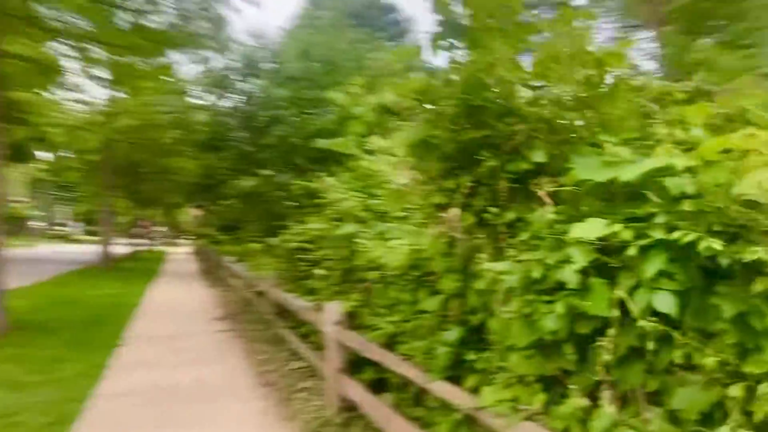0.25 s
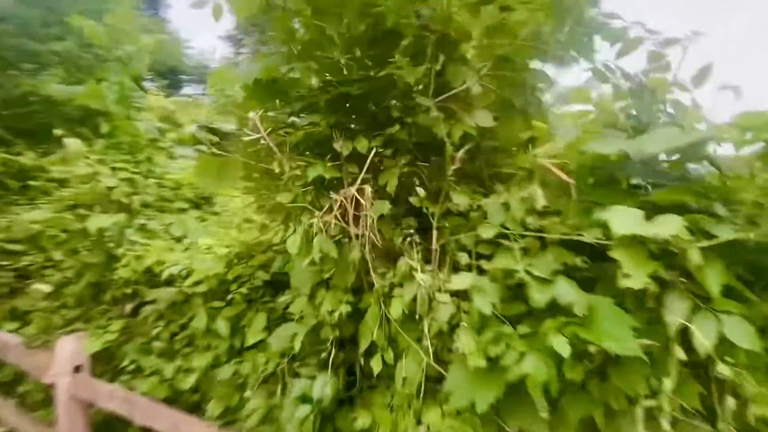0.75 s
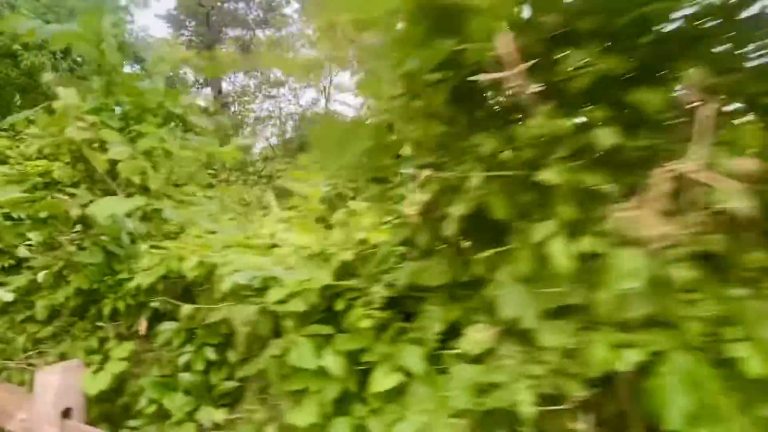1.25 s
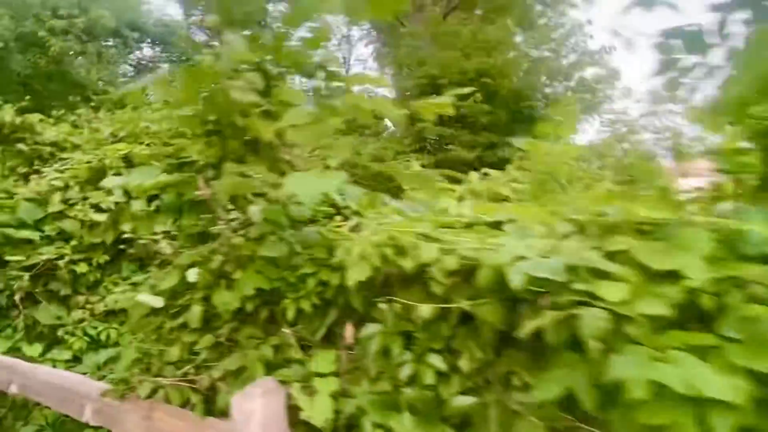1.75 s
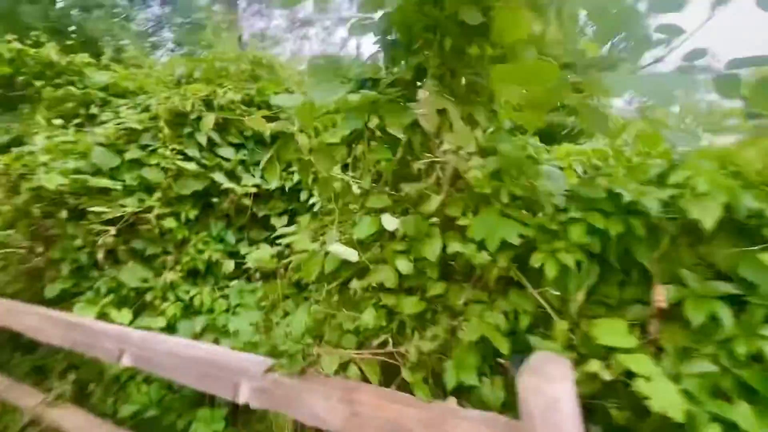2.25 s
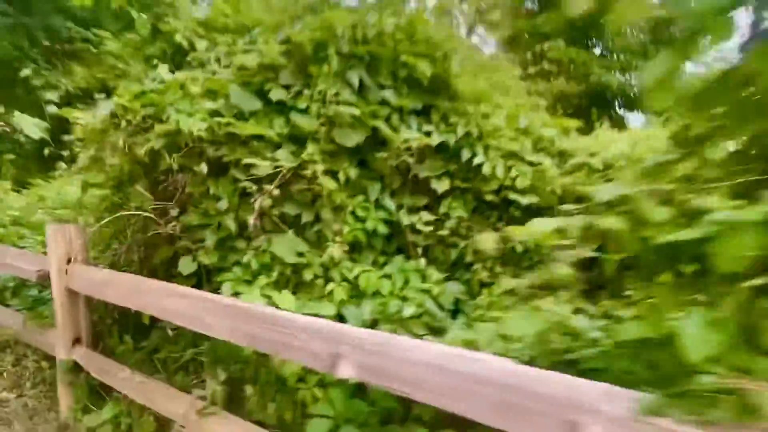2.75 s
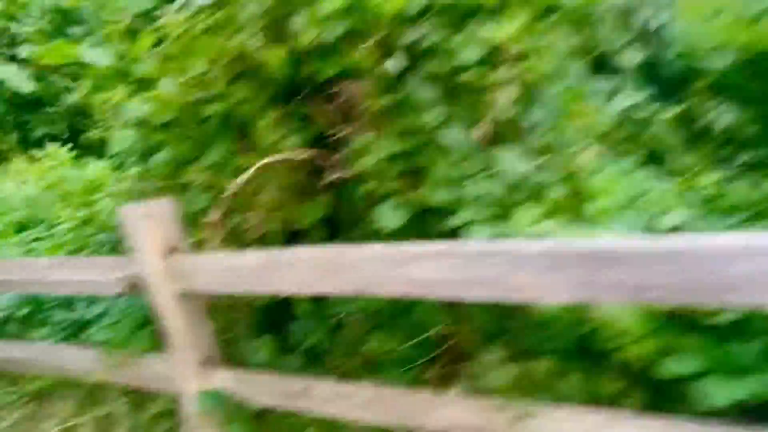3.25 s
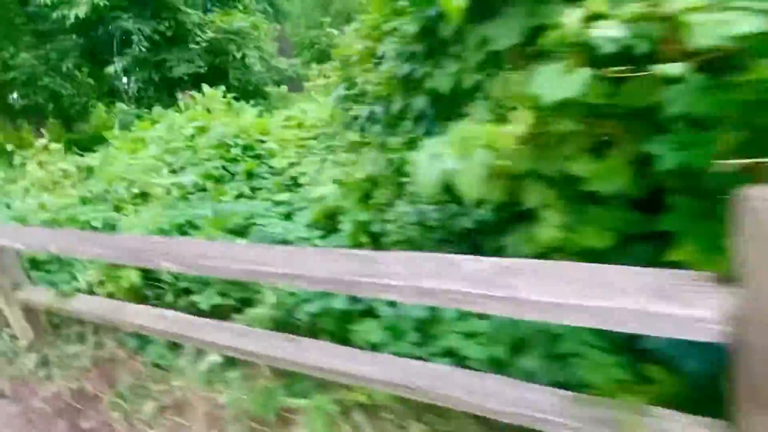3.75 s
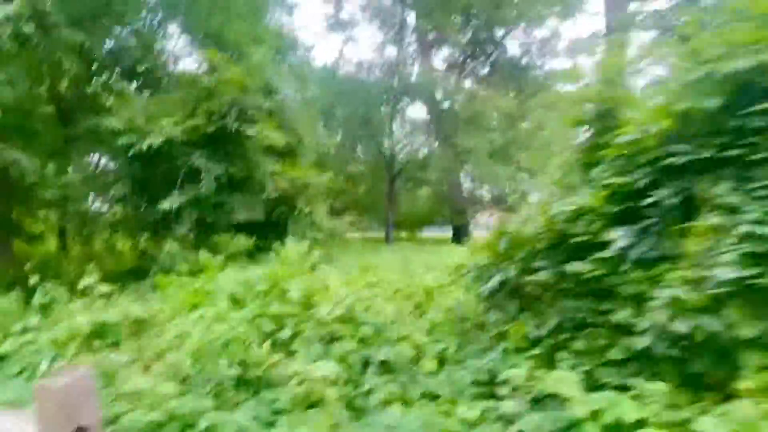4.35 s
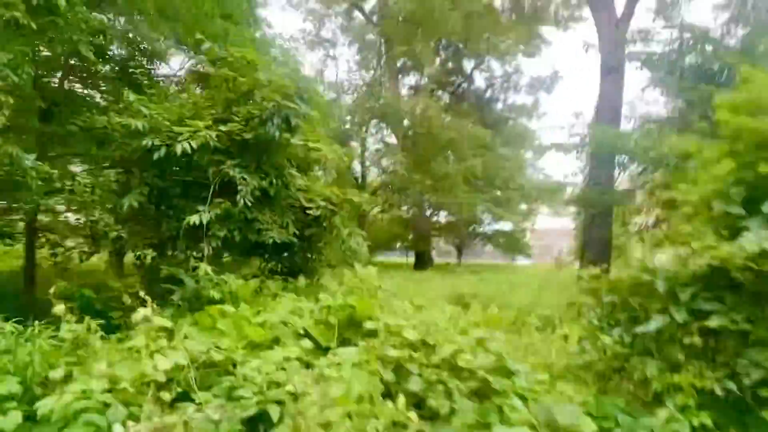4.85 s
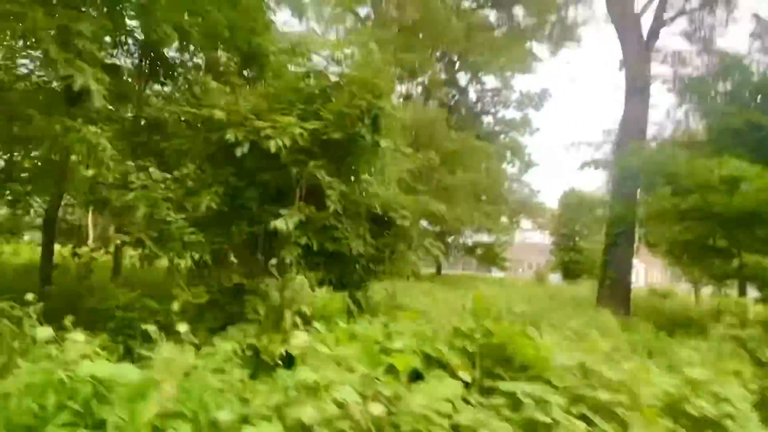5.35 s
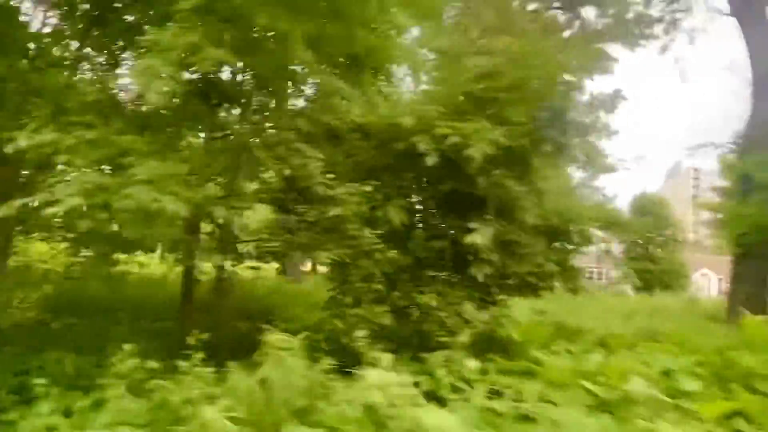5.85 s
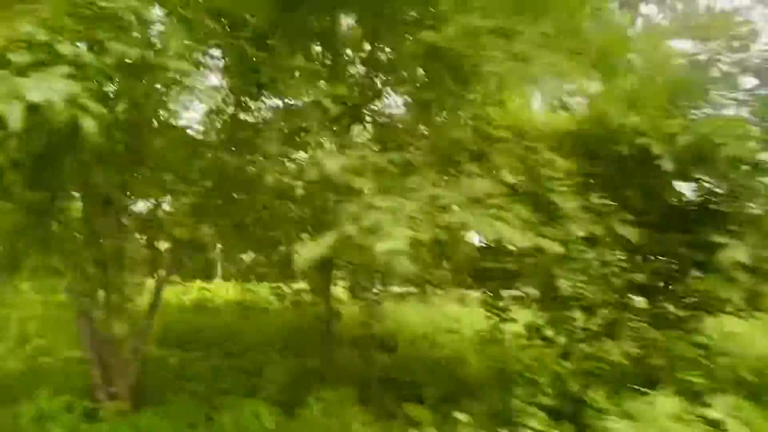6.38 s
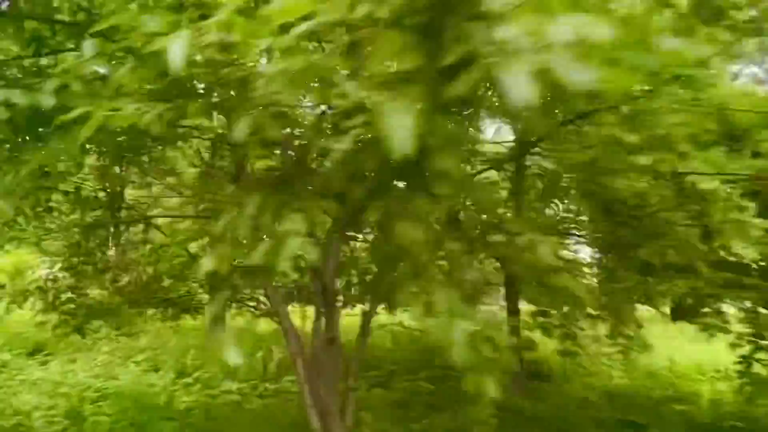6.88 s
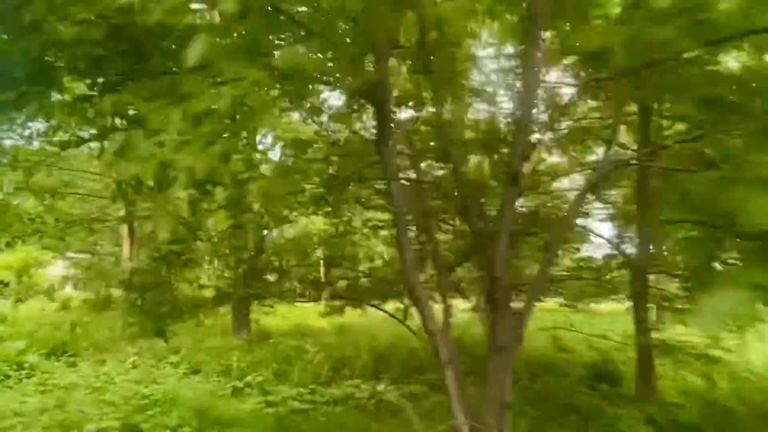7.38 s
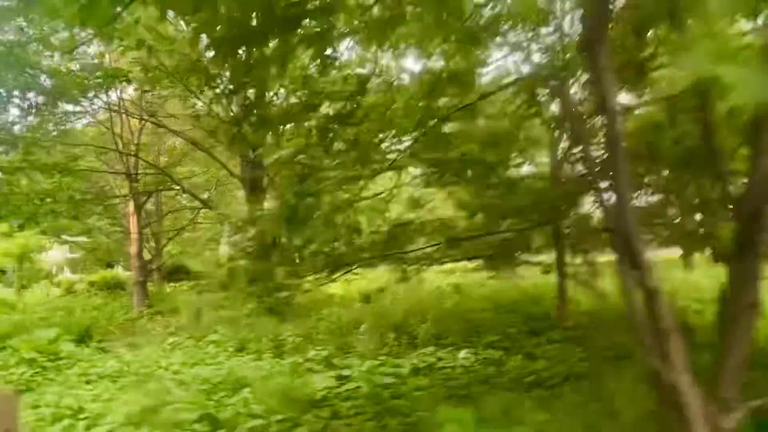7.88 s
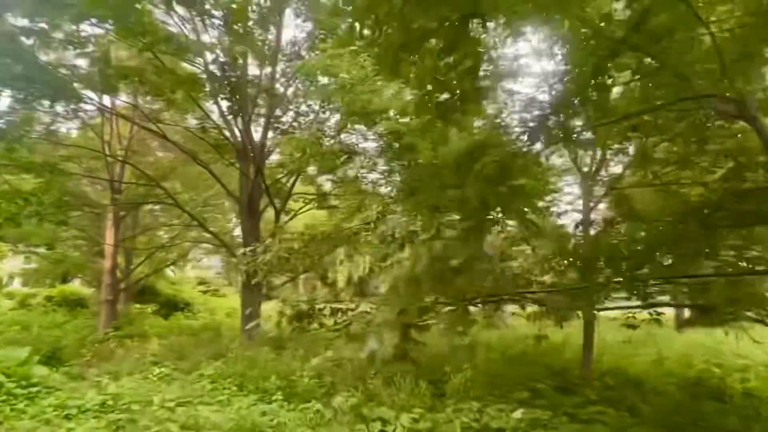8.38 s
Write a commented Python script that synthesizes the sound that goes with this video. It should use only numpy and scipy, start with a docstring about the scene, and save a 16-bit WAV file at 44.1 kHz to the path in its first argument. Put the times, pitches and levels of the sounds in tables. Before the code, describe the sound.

Close to a skateboard on a concrete sidewalk beside a hedge, microphone handheld above the wheels. Heavy low thuds and a scuff open, then soft axle knocks. Broken slabs bring rattling chatter and snapping stones, then sharp double knocks at each joint over rolling roar and gritty crackle. A thin wheel whine appears at the end; a bird slurs faintly.

```python
"""Concrete sidewalk, hedge alongside; the microphone is on a camera in the skateboard rider's hand, above the wheels.
At first jolts thud low, axles knock over a joint, a shoe scuffs and a bird slurs faintly in the trees.
From 2.3 s the board chatters over broken slabs and pits, with scuffs and snapping stones, and picks up speed.
From 4 s hard knocks come at each joint over roar and crackling grit, and the hedge returns a faint tail.
A thin wheel whine enters near the end. Filtered noise and grains make the textures, ringing modes the deck."""
import sys
import numpy as np
from scipy import signal
from scipy.fft import rfft, irfft, next_fast_len
from scipy.io import wavfile
from scipy.ndimage import uniform_filter1d, map_coordinates

SR = 44100
rng = np.random.default_rng(int(sys.argv[2]) if len(sys.argv) > 2 else 0)


def generate_wav(sig):
    """Save sig (samples, or channels by samples) to the path in sys.argv[1] as 16-bit PCM at SR."""
    pcm = np.round(np.clip(np.atleast_2d(sig).T, -1, 1) * 32767).astype(np.int16)
    wavfile.write(sys.argv[1], SR, pcm)


N = 380128
TIME = np.arange(N) / SR
LEAD = 256  # samples ahead of each contact, room for the part that filtering brings early


def gain_of(db):
    """Decibels to amplitude."""
    return 10 ** (np.asarray(db) / 20)


def evened(x):
    """Scales to rms 1."""
    return x / np.sqrt(np.mean(x ** 2) + 1e-20)


def peaked(x):
    """Scales to an envelope peak of 1."""
    return x / abs(signal.hilbert(x)).max()


def read(points, hz):
    """Reads a table on a log-frequency axis."""
    f, value = np.transpose(points)
    return np.interp(np.log(hz + 1), np.log(f + 1), value)


def follow(rows):
    """A curve of (t/s, value) at every sample."""
    t, value = np.transpose(rows)
    return np.interp(TIME, t, value)


def add(mix, s, sound):
    """Mixes a sound in at a time."""
    part = mix[max(round(s * SR), 0):][:len(sound)]
    part += sound[:len(part)]


def colour(x, spectrum, turns=0):
    """Filters by a spectrum; with `turns`, lower frequencies arrive later, by about that many of their cycles."""
    size = next_fast_len(len(x))
    hz = np.fft.rfftfreq(size, 1 / SR)
    lag = np.exp(-2j * np.pi * turns * np.log(1 + hz / 2.5))
    return irfft(rfft(x, size) * gain_of(read(spectrum, hz)) * lag, size)[:len(x)]


def drift(hz):
    """Slow random wander of rms 1, fading out above about the given rate."""
    size = next_fast_len(N, real=True)
    f = np.fft.rfftfreq(size, 1 / SR)
    slow = rfft(rng.standard_normal(size)) * np.exp(-(f / hz) ** 2)
    return evened(irfft(slow, size)[:N])


def grains(size, per_s, spread_db):
    """Sparse clicks at random times and of random strength."""
    strength = gain_of(spread_db * np.minimum(rng.exponential(1, size), 4))
    return rng.standard_normal(size) * strength * (rng.random(size) < per_s / SR)


def blow(scatter_db, t60, contact=0, size=8192):
    """A contact (a click, or a noise burst of `contact` seconds) at sample LEAD, then a scattered decaying tail."""
    t = (np.arange(size) - LEAD) / SR
    burst, tail = rng.standard_normal((2, size))
    hit = burst * np.exp(-(t / contact) ** 2) if contact else 1. * (t == 0)
    tail = tail * gain_of(-60 * abs(t) / t60) * np.clip(t / 0.0032, 0, 1)
    return hit / np.linalg.norm(hit) + gain_of(scatter_db) * tail / np.linalg.norm(tail)


def slur(length, start_hz, end_hz, blur=260):
    """A blurred whistle that glides, swelling and fading."""
    hz = np.linspace(start_hz, end_hz, int(length * SR))
    noise = rng.standard_normal((2, len(hz)))
    a, b = uniform_filter1d(uniform_filter1d(noise, blur), blur)
    tone = ((a + 1j * b) * np.exp(2j * np.pi * np.cumsum(hz) / SR)).real
    return evened(tone * signal.windows.tukey(len(hz), .7))


# an axle crosses a joint between slabs, front and rear in turn: t/s, knock level/dB,
# crack level/dB (before a 1.5 dB trim), knock tilt/dB per octave, second wheel against first/dB,
# second wheel's delay/s, sand crunch level/dB, jolt to the rider level/dB
AXLES = [(.301, -15, -34.5, -15, -4.5, 0.0095, -47.5, -25), (.557, -19.5, -60, -7, -4, 0.013, -53, -21.5),
         (1.216, -17, -50, -10.5, -23, 0.0075, -52.5, -27.5),
         (1.487, -23, -59, -10, -21, 0.015, -54.5, -28), (2.275, -21, -53, -3, -0.5, .012, -48, -20.5),
         (2.500, -12.5, -41, -5.5, -7.5, 0.022, -46, -29), (3.066, -25, -54, -4.5, 3, .005, -49.5, -23),
         (3.235, -22, -54, 0, -11, 0.0091, -56, -30), (3.632, -22.5, -54, -14, -9, .007, -53, -27),
         (3.796, -21.5, -52, 0.5, -3, .007, -53.5, -20.5),
         (4.129, -8.5, -24.5, 4.5, -17.5, 0.013, -38.5, -22.5), (4.315, -17.5, -56, -4, -5, .007, -55, -28),
         (4.659, -6.5, -27, 2.5, -12.5, .016, -44, -23), (4.853, -17, -58, -3.5, -2, 0.011, -53, -22),
         (5.303, -19, -40, 3.5, -7.5, 0.0068, -49, -26.5), (5.489, -23.5, -71, 1.5, -11, .016, -55, -28.5),
         (5.953, -19, -50, -0.5, 6, .009, -43, -33), (6.147, -21, -64, -3, -15, 0.013, -55.5, -24.5),
         (6.627, -11.5, -25.5, 5, -10.5, 0.0092, -40, -33),
         (6.837, -14.5, -49.5, -1, -14, 0.014, -50.5, -25), (7.351, -9, -18.5, 3, -14, 0.016, -45, -27.5),
         (7.586, -6.5, -42, -3.5, -17, 0.013, -46, -21), (8.096, -28, -64, 3, -2.5, .009, -57, -26.5),
         (8.319, -24, -71, -1, -21, .012, -58.5, -23)]
# pits in broken concrete, each caught by one wheel: t/s, knock level/dB, sand crunch level/dB
PITS = [(2.313, -30.5, -56.5), (3.160, -25, -57), (3.190, -22, -61), (3.226, -25, -58.5),
        (3.289, -26, -58.5), (3.314, -28.5, -56.5), (3.403, -25, -55), (3.756, -36, -61)]
PIT_CRACK_DB = -58  # before the same trim
# small stones that snap out from under a wheel: t/s, peak level/dB
STONES = [(2.392, -47), (2.444, -42), (2.769, -49), (3.04, -45.5), (3.532, -50), (3.665, -47),
          (4.716, -37.5)]


def knocks():
    """Each axle's two wheels strike a joint and crush its sand; single wheels drop into pits or snap a stone."""
    out = np.zeros(N)
    lead_s = LEAD / SR
    for s, deck_db, crack_db, tilt_db, second_db, second_s, crunch_db, _ in AXLES:
        add(out, s - lead_s, knock(deck_db, crack_db, tilt_db))
        add(out, s + second_s - lead_s, knock(deck_db + second_db, crack_db + second_db, tilt_db))
        add(out, s - CRUNCH_RISE_S, crunch(crunch_db))
    for s, deck_db, crunch_db in PITS:
        add(out, s - lead_s, knock(deck_db, PIT_CRACK_DB, tilt_db=-3.5))
        add(out, s - CRUNCH_RISE_S, crunch(crunch_db))
    for s, db in STONES:
        snap = colour(blow(scatter_db=4.0, t60=.1), GRIT)
        add(out, s - lead_s, gain_of(db) * peaked(snap))
    return out


# modes of deck and trucks: f/Hz, t60/s, level/dB
DECK_MODES = [(542.3, 0.022, 6), (658, 0.023, 6), (886, 0.022, -7), (1128, 0.017, -13.5), (1350, 0.03, -19),
              (2140, 0.027, -29.5)]
DECK_SHIFT = .025  # random detuning of each mode (share of its frequency, standard deviation)
# the crack of a sharp edge: f/Hz, level/dB per Hz
CRACK = [(400, -10), (900, 4), (1350, 4), (1700, -3.5), (2120, 9.5), (2550, -10), (2950, 3.5), (3200, -4),
         (3550, 1.5), (3950, -2), (4400, -19.5), (4850, -6), (5150, -20), (6000, -12.5), (7000, -18.5),
         (8500, -10), (12000, -30.5)]
# a crack softer than HARD_CRACK_DB loses treble above DULL_HZ (dB per octave for each dB softer)
HARD_CRACK_DB, DULL_HZ, DULLING = -29, 2700, .9


def knock(deck_db, crack_db, tilt_db, size=8192):
    """A wheel strike rings the deck's modes, bass last; a noisy crack follows, duller when softer."""
    t = np.arange(size) / SR
    chance = rng.standard_normal(len(DECK_MODES))  # each strike detunes the modes a little at random
    ring = np.zeros(size)
    for k, (hz, t60, db) in enumerate(DECK_MODES):
        level_db = db + tilt_db * np.log2(hz / DECK_MODES[1][0]) - 60 * t / t60
        tone = np.sin(2 * np.pi * hz * (1 + DECK_SHIFT * chance[k]) * t)
        ring += (-1) ** k * gain_of(level_db) * tone
    deck = signal.fftconvolve(blow(scatter_db=-7.0, t60=0.056), ring)[:size]
    deck = colour(deck, [(150, 8), (500, -8.5), (2200, -9.0), (4500, -37.0)], turns=0.2953)
    softness = max(HARD_CRACK_DB - crack_db, 0)
    spectrum = [(hz, db - DULLING * softness * np.log2(max(hz / DULL_HZ, 1))) for hz, db in CRACK]
    crack = colour(blow(scatter_db=-7, t60=0.14), spectrum, turns=0.814)
    out = gain_of(deck_db) * peaked(deck)
    add(out, 0.0014, gain_of(crack_db - 1.5) * peaked(crack))
    return out


# sand crushed under a wheel: f/Hz, level/dB per Hz
CRUNCH = [(500, -4), (1050, 2.5), (1380, 10), (1700, 4.5), (2150, 5), (2550, -6.5), (3050, -11),
          (3700, -19), (5000, -26.5), (7300, -27), (8200, -9.5), (12000, -23)]
CRUNCH_RISE_S, CRUNCH_T60, CRUNCH_GRAINS_PER_S = 0.0019, 0.14, 2500  # t60 in s


def crunch(db, size=6000):
    """A wheel crushes the sand in a crack: a short, dull spray of grains."""
    t = np.arange(size) / SR
    sand = evened(colour(grains(size, per_s=CRUNCH_GRAINS_PER_S, spread_db=0.5), CRUNCH))
    return gain_of(db - 60 * t / CRUNCH_T60) * np.minimum(t / CRUNCH_RISE_S, 1) * sand


# joints as the board passes them: t/s, rear axle's delay/s
JOINTS = [(front[0], rear[0] - front[0]) for front, rear in zip(AXLES[::2], AXLES[1::2])]
# the slab beyond each joint: roughness level/dB, grit level/dB
SLABS = [(0.5, -2.5), (-5.5, -4.5), (-4.5, 0.5), (-2, 1.5), (1, -1.5), (1.5, 0.5), (0.5, 1), (1, 0.5),
         (-0.5, 0.5), (1, -2), (2.5, -2), (-1, -2.5)]


def over_slabs(column, first_db):
    """A quality of the concrete, passing from one slab to the next between the front and rear crossings."""
    points, before = [], first_db
    for (s, delay), slab in zip(JOINTS, SLABS):
        points += [(s, before), (s + delay, slab[column])]
        before = slab[column]
    return follow(points)


# drumming of the wheels: f/Hz, level/dB per Hz
ROAR = [(60, -11.5), (250, 0), (380, -12.5), (500, -4.5), (630, 3), (750, -8.5), (860, -18), (1100, -28.5),
        (1400, -29.5), (1750, -39), (2200, -44), (2700, -56.5), (4500, -61.5), (12000, -61.5)]
# fine texture of the concrete: f/Hz, level/dB per Hz
FINE = [(500, -32), (850, 9.5), (1080, -2), (1400, -24.5), (2500, -42.5), (6000, -77)]
# fine grit under the wheels: f/Hz, level/dB per Hz
GRIT = [(300, -1), (1050, 2), (1400, 14.5), (1750, 11), (2250, 5.5), (2700, 1), (3200, -4), (4000, -4),
        (5000, -8.5), (7300, -15.5), (8200, 2), (12000, -8)]
# broad rush of the wheels, its spectrum: f/Hz, level/dB per Hz
RUSH = [(35, -9.5), (78, 1), (115, 15.5), (190, -5), (340, -3), (480, -6.5), (700, -11.5), (900, -12),
        (1350, -19.5), (1750, -29), (2150, -25), (2600, -38), (4000, -55.5)]
# and its course: t/s, level/dB
RUSH_DB = [(0, -45.5), (2, -77.5), (2.9, -67.5), (3.8, -62), (4.5, -63), (5.5, -48.5), (6.1, -47.5),
           (6.6, -43.5), (7.2, -47), (8.62, -44.5)]
WHEELBASE_M, CRUISE_M_PER_S = .45, 2.3
# levels at cruising speed, and their change for each doubling of speed
ROAR_DB, ROAR_DB_PER_DOUBLING = -47, 13.5
GRIT_DB, GRIT_DB_PER_DOUBLING = -74, -5
FINE_DB, FINE_DB_PER_DOUBLING = -21.5, 9.5  # against the roar
# the roar's resonances rise with speed and wander at random (shares)
ROAR_PITCH_PER_DOUBLING, ROAR_WANDER = 0.086, .05
# the joints are sandy and chipped: grit and roar flare at each crossing
JOINT_SAND_DB, JOINT_SAND_S, JOINT_ROAR_DB = 3, 0.015, 2
TICKS_PER_S, TICKS_DB = 25, -13  # single grains that pop under a wheel; level against the grit


def rolling():
    """Slab texture drums on the wheels, louder with speed; bearings sing; grit fizzes, fainter with speed."""
    speed = follow([(s, WHEELBASE_M / delay) for s, delay in JOINTS])  # m/s
    doublings = np.log2(speed / CRUISE_M_PER_S)
    roar_db = ROAR_DB + ROAR_DB_PER_DOUBLING * doublings + over_slabs(column=0, first_db=1.5)
    grit_db = GRIT_DB + GRIT_DB_PER_DOUBLING * doublings + over_slabs(column=1, first_db=-3)

    flares = []
    for s, delay in JOINTS:
        for at in (s, s + delay):
            for step, flare in [(-.5, 0.14), (0, 1), (1, 0.94), (2, 0.13)]:
                flares.append((at + step * JOINT_SAND_S, flare))
    in_joint = follow(flares)

    texture = evened(colour(grains(N, per_s=1500, spread_db=.5), ROAR))
    texture = warped(texture, 1 + ROAR_PITCH_PER_DOUBLING * doublings + ROAR_WANDER * drift(hz=7))
    fine = evened(colour(rng.standard_normal(N), FINE))
    texture = texture + gain_of(FINE_DB + FINE_DB_PER_DOUBLING * doublings) * fine
    roar = gain_of(roar_db + JOINT_ROAR_DB * in_joint + 1.33 * drift(hz=27.7)) * texture
    rush = gain_of(follow(RUSH_DB)) * evened(colour(rng.standard_normal(N), RUSH))

    bearings = np.zeros(N)
    for hz, db in [(1400, -67.5), (2150, -79.5)]:
        level = gain_of(db + 2.0 * doublings + 1.2 * drift(hz=5.2))
        pitch = hz * (1 + 0.021 * drift(hz=3.8))
        bearings += level * drift(hz=188) * np.sin(2 * np.pi * np.cumsum(pitch) / SR)

    sand = evened(colour(grains(N, per_s=3500, spread_db=1.3), GRIT))
    sand = patchy(sand, across_hz=400) * gain_of(2.2 * drift(hz=25) + 1.5 * drift(hz=4))
    ticks = evened(colour(grains(N, per_s=TICKS_PER_S, spread_db=1.5), GRIT))
    grit = gain_of(grit_db) * (gain_of(JOINT_SAND_DB * in_joint) * sand + gain_of(TICKS_DB) * ticks)
    return patchy(roar + rush + bearings) + grit


PATCHY_DB = 2.8  # rms of the unevenness


def patchy(x, across_hz=170, along_s=.05, size=1024):
    """The changing ground favours now one band, now another."""
    hz, t, z = signal.stft(x, SR, nperseg=size, noverlap=size * 3 // 4)
    field = rng.standard_normal(z.shape)
    field = uniform_filter1d(field, max(int(across_hz / hz[1]), 1), axis=0)
    field = uniform_filter1d(field, max(int(along_s / t[1]), 1), axis=1)
    z = z * gain_of(PATCHY_DB * evened(field))
    y = signal.istft(z, SR, nperseg=size, noverlap=size * 3 // 4)[1][:N]
    return evened(y) * x.std()


def warped(x, rate):
    """Plays a texture at a changing rate, so that its resonances move."""
    return map_coordinates(x, [np.cumsum(rate) % (N - 1)], order=3)


# stretches of broken concrete: t/s, length/s, level/dB
BROKEN = [(2.269, 0.33, -54.5), (3.129, .25, -47), (3.354, 0.4, -57), (3.624, .3, -59)]
# colour of the chatter: f/Hz, level/dB per Hz
CHATTER = [(250, -9), (400, -1.5), (480, 4), (640, 5.5), (900, -1.5), (1150, -29), (1550, 1), (1850, -13),
           (2200, -21.5), (3000, -25), (3500, -34.5), (7000, -60), (8200, -26), (12000, -23.5)]
CHATTER_PER_S = 90


def chatter():
    """On broken concrete the wheels make a quick, uneven run of tiny strikes."""
    out = np.zeros(N)
    for s, length, db in BROKEN:
        size = int(length * SR)
        hits = grains(size, per_s=CHATTER_PER_S, spread_db=1)
        strikes = signal.fftconvolve(hits, blow(scatter_db=-6, t60=.05, contact=.0015))[:size]
        add(out, s, gain_of(db) * evened(colour(strikes, CHATTER)) * signal.windows.tukey(size, .5))
    return out


# shoe and wheels scraping the concrete: t/s, length/s, level/dB (before the swell), upper edge f/Hz
SCUFFS = [(0.329, 0.18, -57, 5000), (2.275, 0.39, -65.5, 2600), (2.373, 0.11, -67.5, 4650),
          (2.687, 0.11, -67, 4200), (3.14, 0.28, -65, 2900), (3.389, 0.085, -56.5, 6240),
          (3.504, 0.12, -65, 5200), (3.62, 0.4, -73, 3040), (5.907, 0.063, -60.5, 2770)]
# colour of the scrape: f/Hz, level/dB per Hz
SCRAPE = [(300, 3.5), (900, 10), (1400, 12), (1750, 5), (2150, 4.5), (2550, -3), (3000, 5), (3600, -11),
          (3900, -7), (4300, 1.5), (5200, -20), (7500, -12), (12000, -29)]
SCUFF_GRAINS_PER_S, SCUFF_CLUMP_DB = 3500, 1.6
SCUFF_SKEW = 0.65  # a scrape swells quickly and fades slowly (under 1)


def scuffs():
    """Grains catch in uneven clumps, swelling and fading under each scrape."""
    out = np.zeros(N)
    for s, length, db, edge_hz in SCUFFS:
        size = int(length * SR)
        clumps = gain_of(SCUFF_CLUMP_DB * drift(hz=70)[:size])
        rub = colour(clumps * grains(size, per_s=SCUFF_GRAINS_PER_S, spread_db=1.2), SCRAPE)
        rub = signal.sosfilt(signal.butter(4, edge_hz, fs=SR, output="sos"), rub)
        swell = np.sin(np.pi * np.linspace(0, 1, size) ** SCUFF_SKEW)
        add(out, s, gain_of(db) * evened(rub) * swell)
    return out


# a thin whine of a wheel: t/s, level/dB
WHINE = [(7.85, -80), (7.92, -68), (8.015, -66), (8.05, -58), (8.14, -58), (8.185, -63), (8.245, -57.5),
         (8.285, -71), (8.37, -63.5), (8.45, -66), (8.51, -74), (8.57, -65), (8.62, -72)]
# hoarse rising sweeps around the whine's pitch: t/s, length/s, start f/Hz, end f/Hz, level/dB
SWEEPS = [(7.868, .16, 1310, 1540, -65), (8.281, .42, 1420, 1680, -73.5)]
WHINE_HZ, WHINE_WOBBLE, WHINE_FLUTTER = 1401, .006, .25  # wobble of pitch and flutter of level as shares


def whine():
    """A thin tone that swells and wavers, with hoarse rising sweeps."""
    flutter = drift(hz=30) + 1j * drift(hz=30)
    pitch = WHINE_HZ * (1 + WHINE_WOBBLE * drift(hz=14))
    tone = (np.exp(2j * np.pi * np.cumsum(pitch) / SR) * (1 + WHINE_FLUTTER * flutter)).real
    out = gain_of(follow(WHINE)) * evened(tone) * (TIME > WHINE[0][0])
    for s, length, start_hz, end_hz, db in SWEEPS:
        add(out, s, gain_of(db) * slur(length, start_hz, end_hz))
    return out


# heavy jolts that shake the microphone: t/s, peak level/dB, tilt/dB per octave
JOLTS = [(0.051, -23.5, -12.5), (0.265, -12.5, -3.5), (0.319, -9, -4), (1.473, -12, -3.5),
         (1.705, -19, -1.5), (2.334, -17, -4.5), (2.525, -14.5, 2.5), (2.59, -18, -3), (2.811, -15.5, 0),
         (2.97, -14.5, -2), (3.008, -17, 3.5), (3.151, -11, 3.5), (3.321, -15.5, 3.5), (3.371, -19.5, -2),
         (3.457, -19, -4), (3.512, -15.5, -1.5), (5.919, -20, 0), (6.082, -14, -8), (6.646, -19.5, -2.5),
         (6.829, -13, -2.5), (7.663, -12.5, -0.5), (7.967, -21.5, -4)]
# body of a jolt, before its tilt: f/Hz, level/dB per Hz
THUD = [(20, -45), (40, -9.5), (62, 1), (100, -3), (200, -8.5), (330, -18.5), (500, -70), (1000, -94)]
AXLE_THUD_TILT_DB = -1.3  # tilt per octave of the jolt that each axle gives the rider


def jolts():
    """Each jolt is a low thud that falls quickly in pitch; each axle crossing adds one."""
    out = np.zeros(N)
    crossings = [(s, db, AXLE_THUD_TILT_DB) for s, *_, db in AXLES]
    for s, db, tilt_db in JOLTS + crossings:
        spectrum = [(hz, level + tilt_db * np.log2(hz / 60)) for hz, level in THUD]
        thud = peaked(colour(blow(scatter_db=-6.5, t60=0.15), spectrum, turns=1.9))
        add(out, s - LEAD / SR, gain_of(db) * thud * signal.windows.tukey(len(thud), LEAD / len(thud)))
    return out


# how hard the camera shakes: t/s, level/dB
SHAKE = [(0.02, -19), (0.2, -39), (1.3, -32), (1.87, -38), (2.03, -29), (2.22, -37.5), (2.38, -22),
         (2.9, -32.5), (3.2, -30), (3.4, -16.5), (3.7, -25.5), (4.0, -26.5), (4.4, -24), (4.78, -34),
         (5.05, -27), (5.7, -36.5), (6.7, -36.5), (8.6, -38)]
# colour of the shaking: f/Hz, level/dB per Hz
RUMBLE = [(15, -20), (33, 1.5), (45, -6.5), (55, 10), (70, -3), (130, -7), (200, -26), (400, -35),
          (1000, -76)]
SMALL_JOLTS_PER_S, SMALL_JOLTS_DB, RUMBLE_DB = 7, -12.5, -6  # levels against the shaking


def rumble():
    """Low shaking of the moving camera, with small random jolts in it."""
    sway = gain_of(RUMBLE_DB + 1.2 * drift(hz=9)) * evened(colour(rng.standard_normal(N), RUMBLE))
    hits = 1. * (rng.random(N) < SMALL_JOLTS_PER_S / SR)
    bumps = evened(colour(hits, THUD, turns=1.73))
    return gain_of(follow(SHAKE)) * (sway + gain_of(SMALL_JOLTS_DB) * bumps)


# what the hedge throws back: f/Hz, level/dB
LEAVES = [(500, -30), (1100, -18.5), (2000, -2), (3600, -8), (5500, -16)]
LEAVES_DB, LEAVES_T60 = -23.5, 0.28  # t60 in s


def hedge(x):
    """The knocks come back from the leaves as a faint, ragged tail."""
    t = np.arange(SR // 3) / SR
    tail = grains(len(t), per_s=900, spread_db=2) * gain_of(-60 * t / LEAVES_T60) * np.clip(t / .02, 0, 1)
    echo = signal.oaconvolve(x, tail / np.linalg.norm(tail))[:N]
    return gain_of(LEAVES_DB) * colour(echo, LEAVES)


# bird slurs: t/s, length/s, start f/Hz, end f/Hz, level/dB (before the trees' smear and the final mix)
BIRD = [(0.218, 0.15, 2730, 2330, -80.5), (0.803, 0.25, 2750, 2170, -89), (1.515, 0.08, 2830, 2700, -83),
        (1.592, 0.064, 2980, 2980, -88), (1.97, 0.05, 2720, 2940, -83), (5.478, 0.15, 2310, 2000, -76),
        (6.02, 0.11, 2110, 2124, -76), (6.142, 0.24, 2380, 2310, -82.5), (6.922, 0.21, 2850, 2320, -82),
        (7.514, .06, 2430, 2610, -77), (7.593, 0.08, 2790, 3040, -85), (7.662, 0.045, 2300, 2620, -72),
        (8.158, 0.123, 2794, 2620, -81)]


def bird():
    """Far whistled slurs, smeared by the trees."""
    out = np.zeros(N)
    for s, length, start_hz, end_hz, db in BIRD:
        add(out, s, gain_of(db) * slur(length, start_hz, end_hz))
    return signal.oaconvolve(out, blow(scatter_db=0, t60=.3))[:N]


# the two microphone ports face apart: f/Hz, lead of left/radians
PORT_PHASE = [(60, -2.3), (200, -2.7), (600, -2.15), (850, -1.1), (1040, 2.1), (1640, 3.3), (2500, 3.7),
              (4800, 3.85), (5800, 1.3), (7200, 2.3), (8900, 2.55)]
# and differ in level: f/Hz, left minus right/dB
PORT_BALANCE = [(60, .5), (200, 2), (600, .7), (2000, -.2), (8200, 3)]
# the ports are joined to mono below a moving crossover: t/s, f/Hz
MONO_BELOW = [(0, 156), (.45, 85), (.8, 31), (5.3, 8.4), (5.85, 184), (6.3, 410), (6.6, 737), (8.6, 917)]


def ports(near, diffuse):
    """Near sound differs in phase and level between the ports, diffuse sound in sign; mono below the crossover."""
    hz, t, (a, b) = signal.stft(np.array([near, diffuse]), SR, nperseg=1024, noverlap=768)
    crossover = np.interp(t, *np.transpose(MONO_BELOW))
    apart = 1 - 1 / (1 + (hz[:, None] / crossover) ** 4)  # 0 mono, 1 fully apart
    tilt = gain_of(apart * read(PORT_BALANCE, hz)[:, None] / 2)
    turn = np.exp(-1j * apart * read(PORT_PHASE, hz)[:, None])
    pair = np.array([(a + apart * b) * tilt, (a - apart * b) * turn / tilt])
    return signal.istft(pair, SR, nperseg=1024, noverlap=768)[1][:, :N]


def scene():
    """The board below the camera, a share of its sound from all around, and the far bird."""
    strikes = knocks()
    near = strikes + jolts() + rumble() + rolling() + chatter() + scuffs() + whine()
    # fresh random draws, so the surrounding sound is unlike the near sound in detail
    diffuse = gain_of(-10.5) * rumble() + gain_of(-10.0) * rolling() + gain_of(-3.5) * scuffs()
    diffuse += gain_of(-14) * chatter() + gain_of(-17.5) * knocks() + hedge(strikes)
    return ports(near, diffuse) + gain_of(-7) * bird()


# treble lift with a sharp lower edge near 8 kHz: f/Hz, level/dB
TREBLE_LIFT = [(8000, 18.5), (8350, 13), (9000, 2.5), (10000, -17), (12000, -22)]
LIFT_HZ, EDGE_HZ = 7990, 12250  # lower edge of the lift, upper band limit


def record(dry):
    """A treble lift from 8 kHz, then the band limit."""
    hz = np.fft.rfftfreq(N, 1 / SR)
    response = uniform_filter1d(gain_of(read(TREBLE_LIFT, hz) * (hz > LIFT_HZ)), size=500)
    faded = dry * signal.windows.tukey(N, 500 / N)
    bright = irfft(rfft(faded) * response, N)
    lowpass = signal.firwin(511, EDGE_HZ, window=("kaiser", 9), fs=SR)
    return signal.oaconvolve(bright, lowpass[None], "same")


dry = scene()
out = record(dry)
generate_wav(out)
```